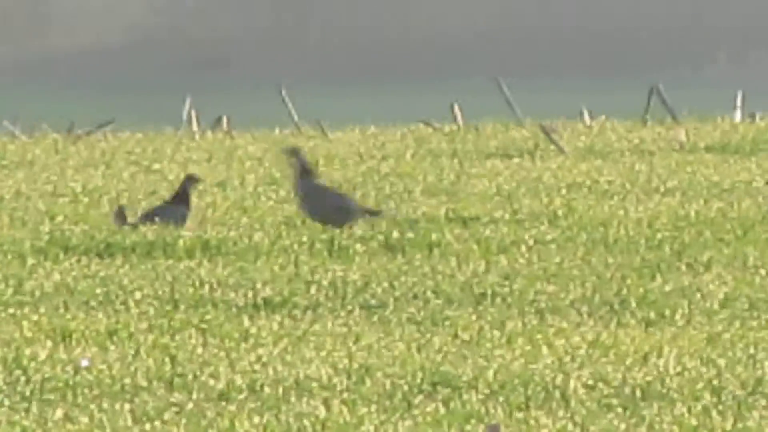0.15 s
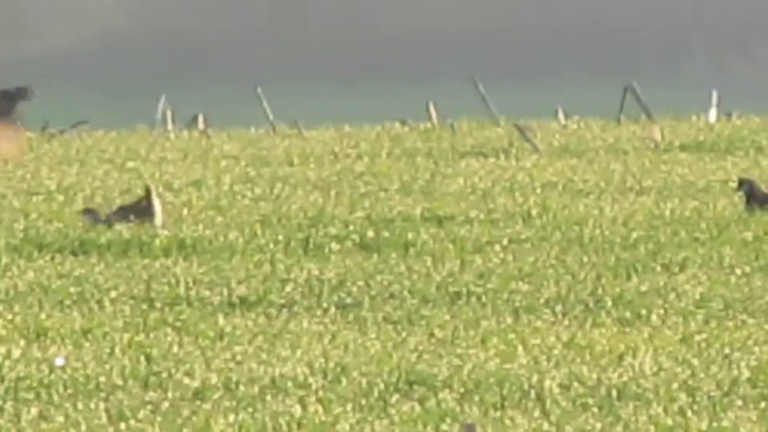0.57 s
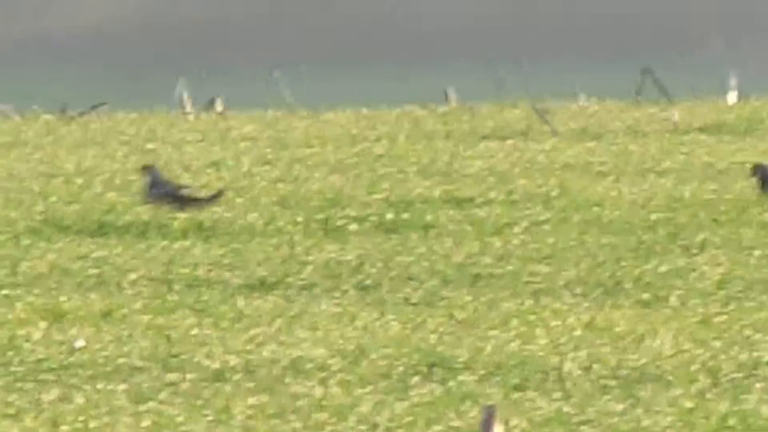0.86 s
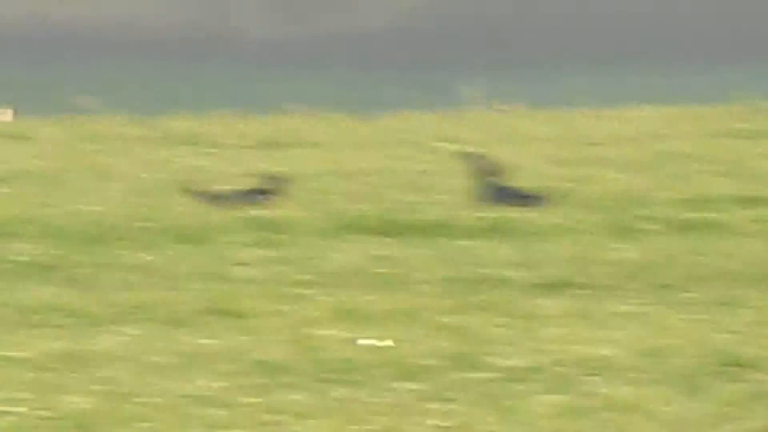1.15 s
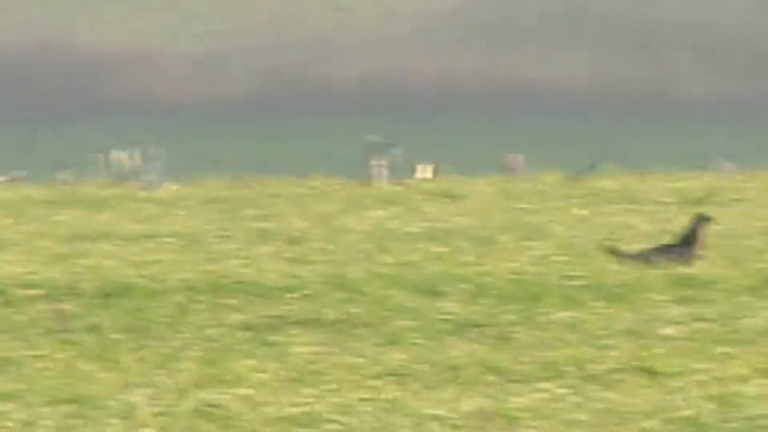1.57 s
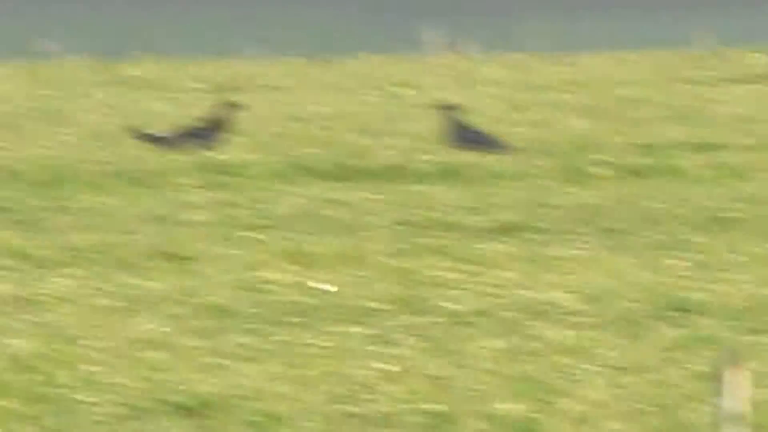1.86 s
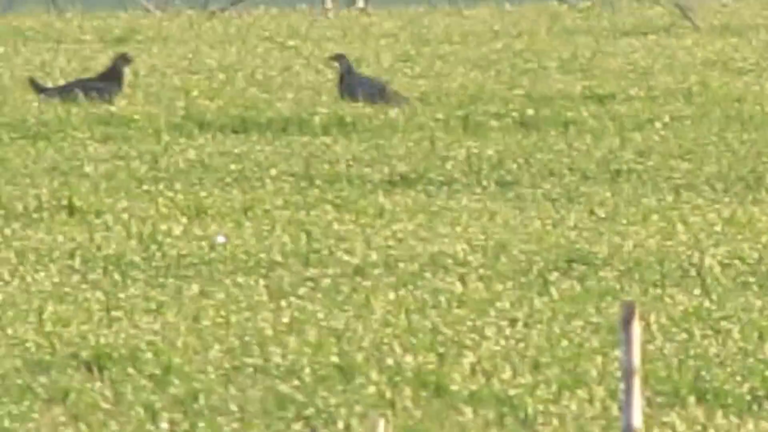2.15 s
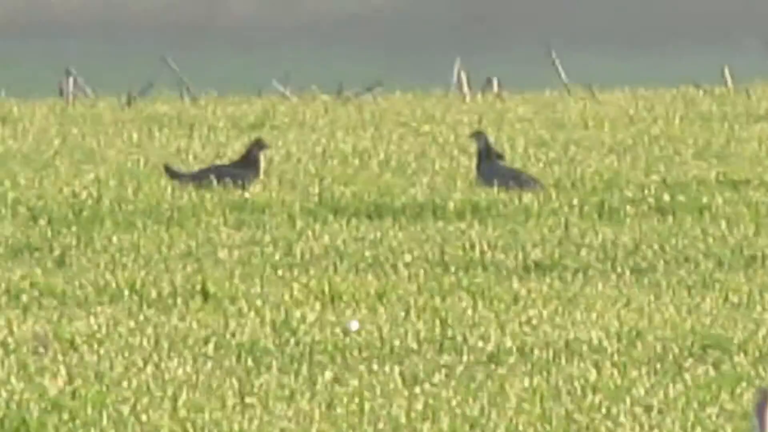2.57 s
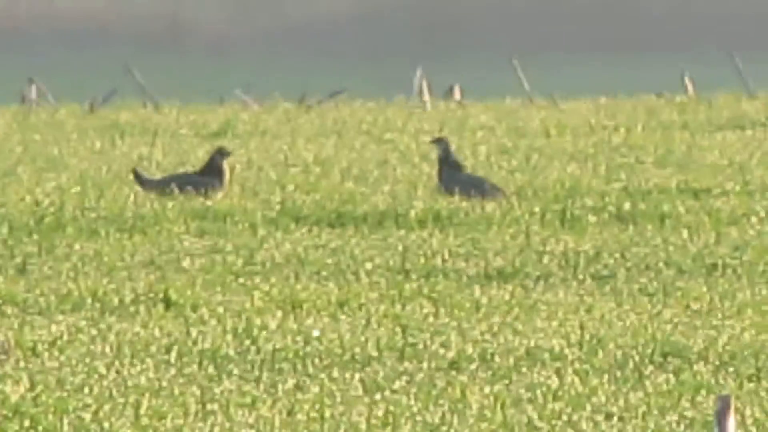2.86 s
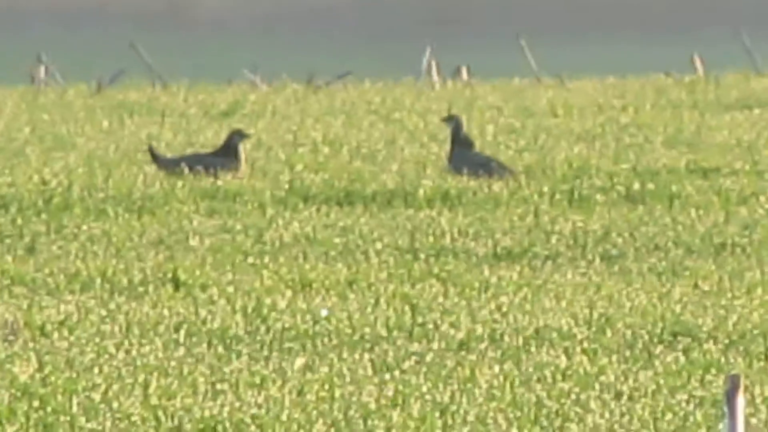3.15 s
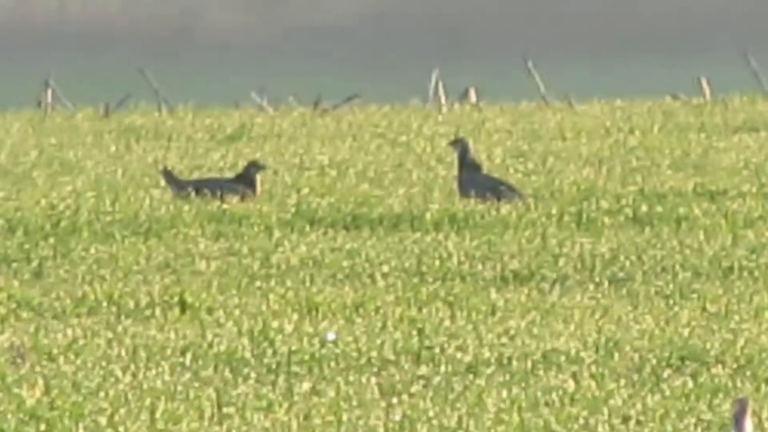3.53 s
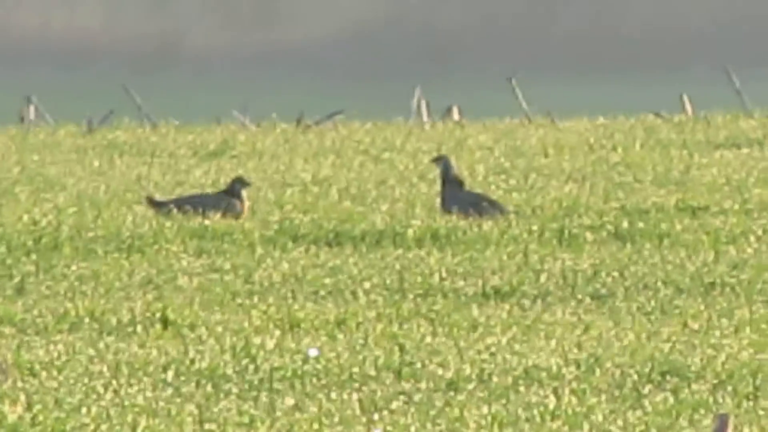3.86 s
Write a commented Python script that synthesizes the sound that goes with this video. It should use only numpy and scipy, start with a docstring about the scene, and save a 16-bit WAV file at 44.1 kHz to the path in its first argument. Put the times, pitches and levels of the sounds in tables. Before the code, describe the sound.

Wind buffets the microphone throughout with a low rumble, opening with thumps and a sharp crack. A light handling knock comes at 0.5 seconds, then faint ticks as the wind eases. Distant grouse cackle faintly from 1 to 2 seconds, then cluck, while far songbirds whistle and chirp thinly. Thumps return from 2 seconds, and the loudest gust hits with brief crackles from 3.7 to 4 seconds.

```python
"""Gusts and far birds in an open field

Wind buffets a hand-held camera; its eddies push the two microphone ports in opposite directions.
The hardest thumps carry sharp overload cracks and drive the limiter, which ducks the field and
recovers slowly. Close up are a few faint handling ticks, a knock and a rustle of the grip.
Far out, songbirds whistle and chip, and grouse cluck and cackle."""
import sys
import numpy as np
from scipy import signal
from scipy.io import wavfile
from scipy.ndimage import uniform_filter1d, minimum_filter1d

SR = 44100
rng = np.random.default_rng(int(sys.argv[2]) if len(sys.argv) > 2 else 0)


def waveform_to_disk(signal):
    """Save audio, clipped to [-1, 1], as 16-bit WAV at the path in sys.argv[1]."""
    frames = np.transpose(np.atleast_2d(signal))
    scaled = np.clip(frames, -1, 1) * 32767
    samples = np.round(scaled).astype(np.int16)
    wavfile.write(sys.argv[1], SR, samples)


N = 176400
TIME = np.arange(N) / SR
PORT_LEAK = 0.23  # how much wind each microphone port has of its own
WARBLE_DEPTH_HZ = 221  # pitch swing of the buzzes and chips


def amp(db):
    """Decibels to gain."""
    return 10 ** (np.asarray(db) / 20)


def unit(x):
    """Scales to rms 1."""
    return x / np.sqrt(np.mean(x ** 2) + 1e-20)


def add(mix, s, sound):
    """Mixes a sound in at s seconds."""
    part = mix[..., max(round(s * SR), 0):][..., :sound.shape[-1]]
    part += sound[..., :part.shape[-1]]


def pan(db):
    """Left and right gains, the left louder by db."""
    return amp([[db / 2], [-db / 2]])


def swell(centre, length):
    """A bell-shaped rise and fall, times in seconds."""
    return np.exp(-np.minimum((2 * (TIME - centre) / length) ** 2, 20))


def eddy(hz):
    """Pressure of one eddy passing a port: a smooth bump between two shallow dips."""
    half = int(SR / hz * 2)
    u = (np.pi * hz * np.arange(-half, half + 1) / SR) ** 2
    return (1 - 2 * u) * np.exp(-u)


def wind(eddies_per_cycle=2.2, splutter_db=4, splutter_s=0.0057):
    """Random eddies right on the microphone; the small ones are heard only in strong turbulence."""
    # slow push of the wind, the deep rumble: t/s, level/dB
    push = [(0, -15), (.1, -16), (.7, -19), (.85, -25), (1, -20), (1.35, -24), (1.85, -20), (2, -20.5),
            (2.42, -18.5), (2.6, -22), (2.7, -32.5), (2.88, -20), (3.08, -24.5), (3.17, -9.5), (3.35, -25),
            (3.5, -16), (3.7, -14.5), (3.8, -5.5), (4, -10)]
    # turbulence between the gusts: t/s, level/dB
    turbulence = [(0, -21.5), (.1, -21), (.26, -16), (.33, -40.5), (.38, -28.5), (.8, -35.5), (.85, -56.5),
                  (1.05, -39.5), (1.3, -53), (1.7, -40), (1.93, -44.5), (2.03, -28), (2.42, -27),
                  (2.5, -47), (2.62, -42.5), (2.7, -89), (2.92, -37.5), (3.1, -39.5), (3.23, -22),
                  (3.39, -45), (3.5, -30), (3.63, -48), (3.78, -20), (3.91, -10), (4, -5)]
    # short gusts: centre t/s, length/s, level/dB
    gusts = [(0.425, 0.023, -12.5), (0.471, 0.038, -16), (0.567, 0.027, -22.5), (0.628, 0.052, -24.5),
             (0.715, 0.0095, -17), (0.782, 0.024, -24.5), (0.998, 0.018, -18.5), (1.114, 0.033, -25.5),
             (1.257, 0.033, -28.5), (1.413, 0.014, -20), (1.733, 0.0075, -20.5), (1.865, 0.038, -26.5),
             (1.983, 0.036, -27), (2.053, 0.04, -26.5), (2.449, 0.03, -22.5), (3.002, 0.023, -20.5),
             (3.161, 0.011, -10), (3.207, 0.014, -15.5), (3.458, 0.028, -18.5), (3.531, 0.046, -22),
             (3.596, 0.022, -11), (3.667, 0.02, -10), (3.728, 0.021, -9.5), (3.833, 0.015, 1.5),
             (3.857, 0.02, 1), (3.968, 0.028, -3.5)]
    # eddy sizes: f/Hz, usual level/dB, dB per dB of turbulence, dB per dB of push
    eddy_sizes = [(39.2, -29, -0.1, 0.9), (68.2, -19.5, 0.2939, 0.44), (139.3, -19, .5, 0.18),
                  (210.5, -25, 1.0916, -0.7754), (338, -38.5, 1.21, 0), (536, -51, 1.01, 1),
                  (980, -69.5, 1.31, 1), (1450, -77.5, 1.68, 0.5)]
    power = amp(np.interp(TIME, *np.transpose(turbulence))) ** 2
    for s, length, db in gusts:
        power += amp(db) ** 2 * swell(s, length)
    window = np.hanning(int(2 * splutter_s * SR))
    splutter = unit(signal.oaconvolve(rng.standard_normal(N), window, "same"))  # fast random swings
    usual_turbulence_db, usual_push_db = -25, -17
    turbulence_db = 10 * np.log10(power) - usual_turbulence_db
    turbulence_db += splutter_db * (np.minimum(splutter, 2) - .5)
    push_db = np.interp(TIME, *np.transpose(push)) - usual_push_db
    out = np.zeros((2, N))
    for hz, db, by_turbulence, by_push in eddy_sizes:
        arrives = rng.random((3, N)) < eddies_per_cycle * hz / SR  # at both ports, left, right
        strength, sign, lean = rng.standard_normal((3, N))
        hits = unit(arrives * np.sign(sign) * amp(1.5 * np.clip(strength, -2, 2)))
        spread = 0.34 * (hz / 150) ** 0.13  # small eddies are the more one-sided
        ports = hits[0] * (spread * lean + [[1], [-1]]) + PORT_LEAK * hits[1:]
        ports *= amp(db + by_turbulence * turbulence_db + by_push * push_db)
        shape = eddy(hz)
        out += signal.oaconvolve(ports, shape[None] / np.linalg.norm(shape), "same", axes=1)
    return out


def air(level_db=-57, patch_db=3):
    """Air over the field and microphone hiss: a steady, wide hush with faint drifting patches."""
    # spectrum of the hush: f/Hz, relative level/dB
    spectrum = [(100, 9), (500, 0), (900, -1), (1600, -5), (2400, -8.5), (3500, -11), (6000, -14.5),
                (10000, -18), (15500, -24)]
    frames, hz = N // 256 + 5, np.fft.rfftfreq(1024, 1 / SR)
    real, imag, patches = rng.standard_normal((3, 2, 513, frames))
    patches = unit(uniform_filter1d(uniform_filter1d(patches, size=6, axis=1), size=12, axis=2))
    f, db = np.transpose(spectrum)
    colour_db = np.interp(np.log(hz + 1), np.log(f), db)[:, None]
    bins = (real + 1j * imag) * amp(colour_db + patch_db * patches)
    hush = signal.istft(bins, nperseg=1024, noverlap=768)[1][:, :N]
    return amp(level_db) * pan(-1.1) * unit(hush)


def cracks_and_ticks(decay_s=.0007):
    """Tiny noise bursts: sharp overload cracks on hard wind thumps, and a few faint handling ticks."""
    # loud cracks and faint ticks: t/s, level/dB, left over right/dB
    bursts = [(.022, -53, 1), (0.07, -22.5, 5.5), (0.953, -47, -14), (1.195, -41, -12), (1.264, -43, -11),
              (1.335, -40, -13.5), (1.448, -44, -8.5), (3.166, -28, -6), (3.731, -36.5, 9),
              (3.766, -28, 6.5), (3.821, -31, -7.5)]
    out, t = np.zeros((2, N)), np.arange(3000) / SR
    for s, db, side_db in bursts:
        burst = np.exp(-t / decay_s) * rng.standard_normal(len(t)) / 2
        add(out, s, amp(db) * pan(side_db) * [[1], [-1]] * burst)
    return out


def note(length, from_hz, to_hz, db, warble_depth_hz=0, warble_hz=138.2, edge_s=0.025):
    """A bird's near-pure glide that eases into its last pitch; a fast warble makes it buzz."""
    t = np.arange(0, length, 1 / SR)
    waver = unit(uniform_filter1d(rng.standard_normal(SR), 200))[:len(t)]
    glide = to_hz + (from_hz - to_hz) * (1 - t / length) ** 1.4
    warble = warble_depth_hz * (np.sin(2 * np.pi * warble_hz * t) + waver)
    hz = glide * (1 + 0.0076 * waver) + warble
    fade = np.minimum(np.minimum(t, length - t) / min(edge_s, length / 2), 1)
    flutter_db = 3 * waver[::-1]  # moving air makes the far calls flutter
    return amp(db + flutter_db) * fade * np.sin(2 * np.pi * np.cumsum(hz) / SR)


def whistles():
    """Far songbirds whistle thin notes, most of them falling."""
    # whistled notes: t/s, length/s, from f/Hz, to f/Hz, level/dB
    calls = [(0.036, .17, 3180, 2830, -71.5), (0.288, .18, 4420, 4060, -76.5),
             (0.425, 0.095, 3210, 2970, -64), (0.555, 0.085, 2860, 2690, -66.5),
             (0.527, 0.23, 3500, 3220, -74), (0.734, 0.23, 3405, 3400, -72.5),
             (1.982, 0.076, 1920, 1620, -68), (2.084, 0.18, 6780, 4620, -69.5),
             (2.851, 0.16, 5640, 5150, -69), (3.033, 0.14, 5150, 4040, -64.5),
             (3.333, 0.13, 4850, 4620, -63), (3.453, 0.075, 4800, 4790, -67),
             (3.582, 0.076, 3710, 3430, -59), (3.599, 0.057, 6050, 4720, -64.5),
             (3.669, 0.28, 3572, 3550, -65), (2.955, 0.085, 1950, 2043, -61)]
    out = np.zeros(N)
    for s, *call in calls:
        add(out, s, note(*call))
    return out


def thumps(cascade_ratio=1.69, cascade_db=-13):
    """The hardest eddies hit the ports, each breaking into smaller and weaker ones."""
    # single hard eddies: t/s, level/dB, f/Hz
    hard_eddies = [(.071, 6, 121), (0.094, -2.5, 168), (0.124, -3, 293), (.168, 0, 185), (0.191, 5.5, 163),
                   (0.235, -3, 238), (.425, -5, 220), (.465, -6.5, 190), (.613, -14.5, 194),
                   (2.023, -8, 163), (2.15, -1.5, 140), (2.204, -6, 132), (2.341, -2.5, 148),
                   (2.44, -1.5, 131), (2.835, -5.5, 127), (2.948, -6, 134), (3.166, 0, 234),
                   (3.206, -5.5, 190), (3.589, -3.5, 151), (3.717, 2, 160), (3.769, 2, 110),
                   (3.796, 2, 133), (3.832, 11, 320), (3.861, 4.5, 380), (3.884, 6.5, 266), (3.92, 3, 241),
                   (3.959, 2.5, 218), (3.98, 7, 294)]
    out = np.zeros((2, N))
    for s, db, hz in hard_eddies:
        for k in range(4):
            eddy_hz = hz * cascade_ratio ** k
            shape = eddy(eddy_hz) * rng.choice([-1, 1])
            lag = k * rng.uniform(-0.18, 0.2) / eddy_hz
            ports = pan(4 + 2.5 * k) * [[1], [-1]]  # smaller eddies lean further left
            ports += k * PORT_LEAK * rng.standard_normal((2, 1))
            add(out, s + lag - len(shape) / 2 / SR, amp(db + k * cascade_db) * shape * ports)
    return out


def knock(start_s=.522, attack_s=.0007):
    """One knock sets the camera casing ringing briefly."""
    # modes of the casing: f/Hz, relative level/dB, T60/s
    modes = [(1190, 2.5, 0.024), (1520, 0, 0.03), (1856, 6.5, 0.032), (2210, -4, 0.019), (2560, -1, 0.029),
             (3670, -4.5, 0.026)]
    out, t = np.zeros(N), np.arange(3000) / SR
    ring = sum(amp(db - 60 * t / t60) * np.sin(2 * np.pi * (hz * t + rng.random()))
               for hz, db, t60 in modes)
    ring *= np.minimum(t / attack_s, 1)
    add(out, start_s, amp(-34) * ring / abs(ring).max())
    return out


def rustle():
    """The grip rubs grainily as the camera swings."""
    grains = rng.standard_normal((2, N))
    grains *= amp(4 * unit(uniform_filter1d(rng.standard_normal(N), size=90)))
    rub = unit(signal.lfilter(*signal.butter(1, 900, "high", fs=SR), grains))
    return amp(-67) * rub * swell(centre=1.1, length=0.32)


def cackle(start_s=1.14, step_s=.06, fall=0.147):
    """A distant grouse cackles a quick row of falling notes."""
    out = np.zeros(N)
    for k in range(13):
        hz = 970 * rng.uniform(0.93, 1.04)
        add(out, start_s + k * step_s, note(0.036, hz, hz * (1 - fall), db=rng.normal(-60.5, 2.1)))
    return out


def buzzes():
    """Far songbird notes, warbled into a buzz, that swell towards their ends."""
    # buzzy notes: t/s, length/s, from f/Hz, to f/Hz, level/dB
    calls = [(1.437, .105, 4520, 3900, -64.5), (1.755, 0.09, 4810, 4050, -66),
             (2.785, .1, 3720, 3820, -62.5), (2.861, 0.062, 3800, 4720, -60.5)]
    out = np.zeros(N)
    for s, *call in calls:
        buzz = note(*call, WARBLE_DEPTH_HZ)
        add(out, s, buzz * np.linspace(.5, 1, len(buzz)))
    return out


def clucks(throat_hz=2046, throat_width_hz=230):
    """Far grouse give nasal, sliding calls whose harmonics pass one throat resonance."""
    # grouse clucks: t/s, length/s, from f/Hz, to f/Hz, level/dB
    calls = [(2.025, 0.077, 730, 680, -63), (2.37, 0.06, 848, 664, -54.5), (2.639, .056, 980, 774, -52.5),
             (2.928, 0.051, 673, 772, -57), (3.042, 0.027, 673, 762, -54), (3.057, 0.037, 799, 694, -53.5),
             (3.248, 0.037, 734, 630, -62), (3.678, 0.057, 817, 680, -55.5)]
    out = np.zeros(N)
    for s, length, from_hz, to_hz, db in calls:
        t = np.arange(0, length, 1 / SR)
        arch = np.sin(np.pi * t / length)
        jitter = unit(uniform_filter1d(rng.standard_normal(SR), size=60))[:len(t)]
        hz = np.linspace(from_hz, to_hz, len(t)) * (1 + 0.047 * (arch - .5) + 0.04 * jitter)
        phase = 2 * np.pi * np.cumsum(hz) / SR
        overtones = sum(np.sin(k * phase) / (1 + ((k * hz - throat_hz) / throat_width_hz) ** 2)
                        for k in range(2, 6))
        add(out, s, amp(db) * arch * (.5 * np.sin(phase) + overtones))
    return out


def chips(first_s=2.994, step_s=.0652, length_s=0.019, loudest_s=3.45, fade_db_per_s=19):
    """A far songbird's even run of rising two-tone chips swells and fades."""
    out = np.zeros(N)
    for s in first_s + step_s * np.arange(13):
        db = -55.5 - fade_db_per_s * abs(s - loudest_s)
        glide_hz = np.array([4250, 4664]) * rng.uniform(0.95, 1.02, 2)
        lower = note(length_s, *glide_hz, db, WARBLE_DEPTH_HZ)
        upper = note(length_s, *glide_hz * 1.25, db - 9.5, WARBLE_DEPTH_HZ)
        add(out, s - length_s / 2, lower + upper)
    return out


def across_field(calls, echo_db=-4.5, t60_s=0.25):
    """Far calls arrive just right of centre, with a thin echo scattered by the field."""
    tail = rng.standard_normal((2, SR // 2)) * amp(-60 * TIME[:SR // 2] / t60_s)
    echo = signal.fftconvolve(calls[None], tail / np.linalg.norm(tail[0]), axes=1)[:, :N]
    return calls * pan(-0.96) + amp(echo_db) * echo


def scene():
    """Wind and hand at the microphone, birds far out in the field."""
    close = wind() + thumps() + cracks_and_ticks() + knock() + rustle()
    birds = whistles() + buzzes() + chips() + clucks() + cackle()
    return close + across_field(birds) + air()


def record(dry, limit_db=-.1, recover_db_per_s=4.5, band_edge_hz=15850):
    """The camera's look-ahead limiter ducks at once and recovers slowly; a low-pass follows."""
    over_db = np.maximum(20 * np.log10(abs(dry).max(0) + 1e-9) - limit_db, 0)
    held_db = -minimum_filter1d(-over_db, size=260)
    recovery_db = TIME * recover_db_per_s
    start_duck_db = 1.5  # still recovering from an earlier gust
    duck_db = np.maximum.accumulate(np.maximum(held_db + recovery_db, start_duck_db)) - recovery_db
    limited = dry / amp(uniform_filter1d(uniform_filter1d(duck_db, size=130), size=130))
    lowpass = signal.firwin(511, band_edge_hz, window=("kaiser", 9), fs=SR)
    return signal.oaconvolve(limited, lowpass[None], "same")


dry = scene()
out = record(dry)
waveform_to_disk(out)
```